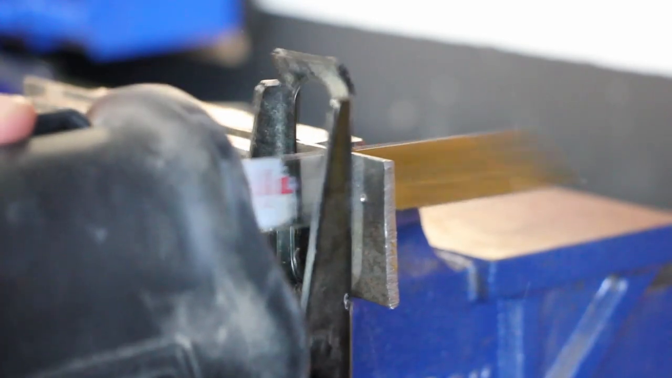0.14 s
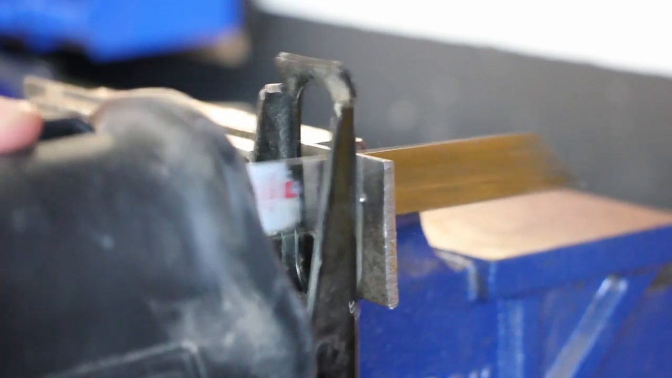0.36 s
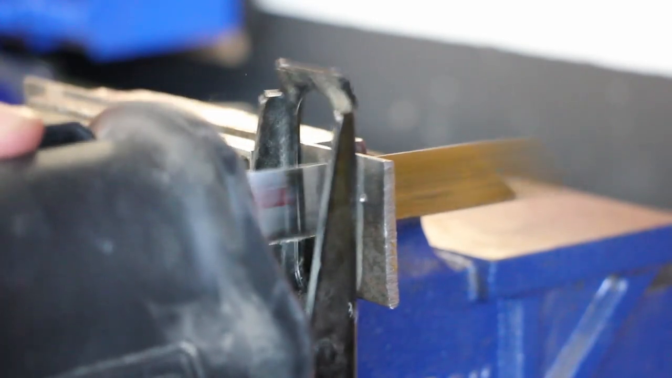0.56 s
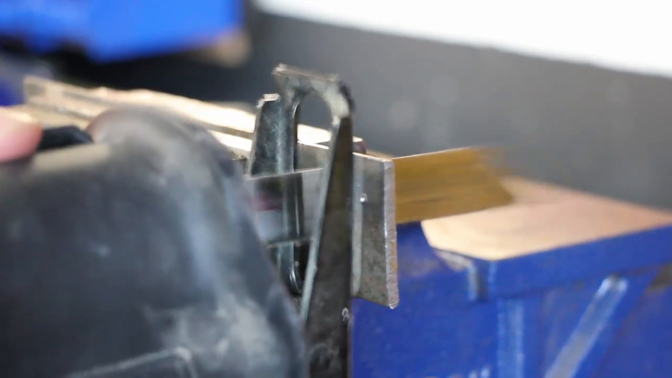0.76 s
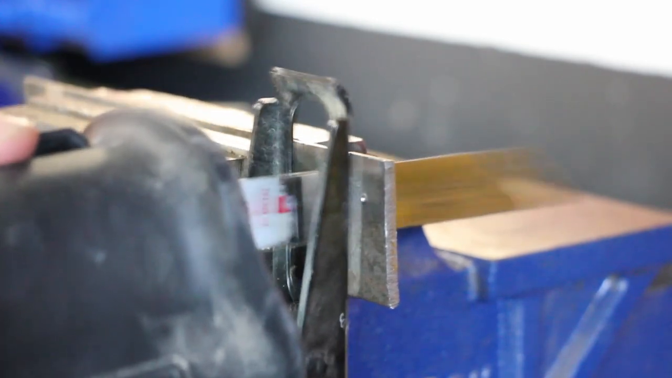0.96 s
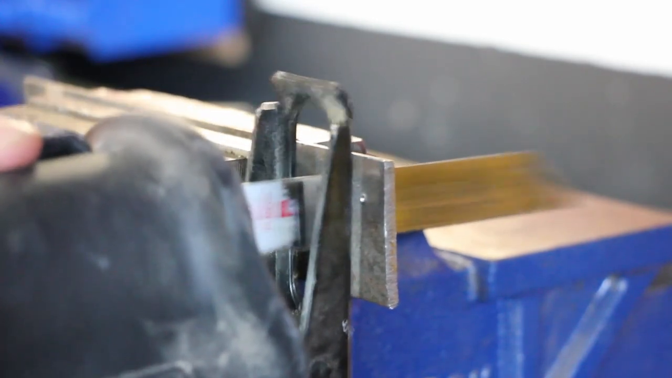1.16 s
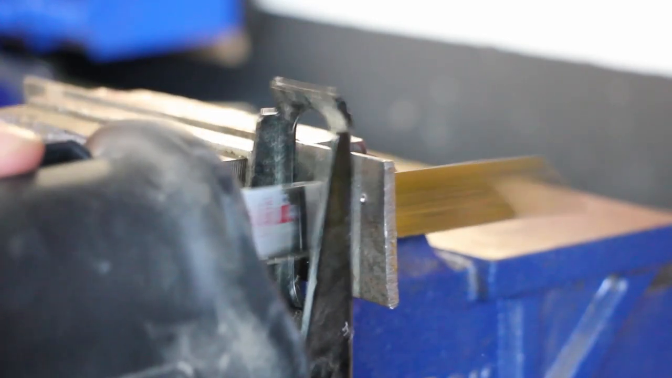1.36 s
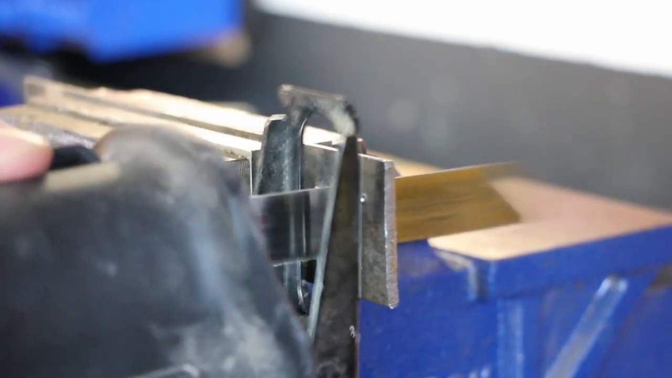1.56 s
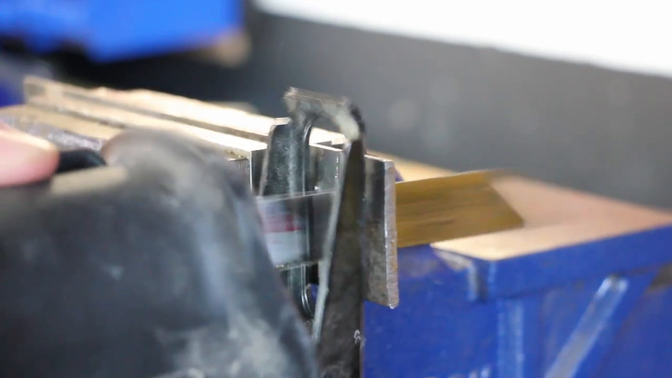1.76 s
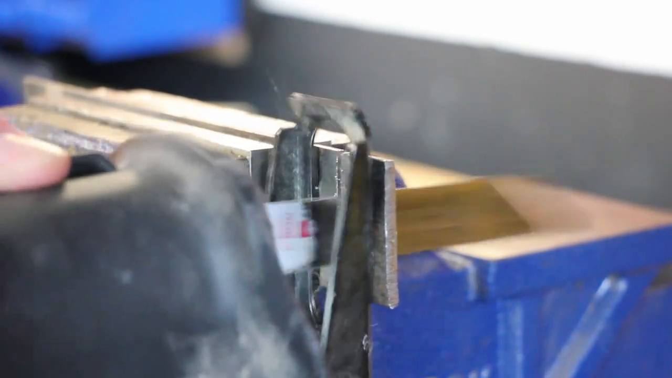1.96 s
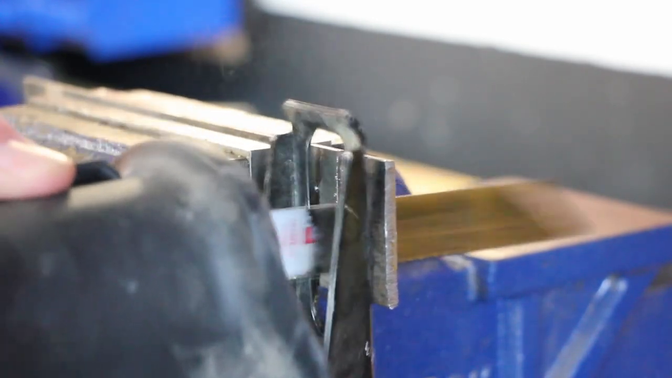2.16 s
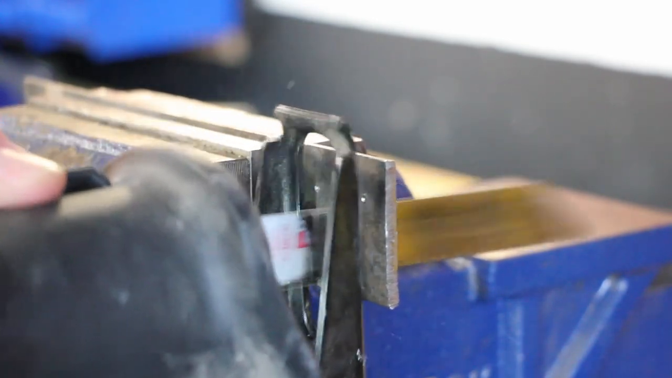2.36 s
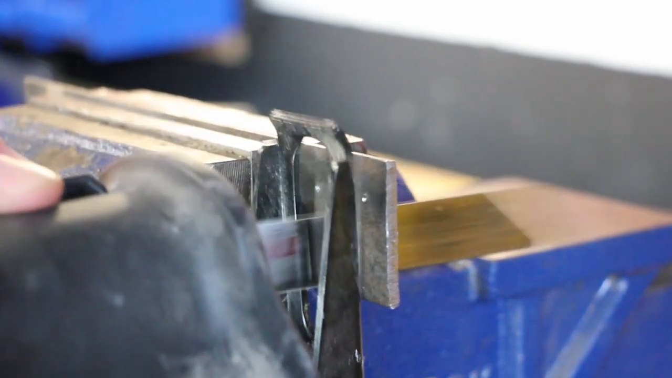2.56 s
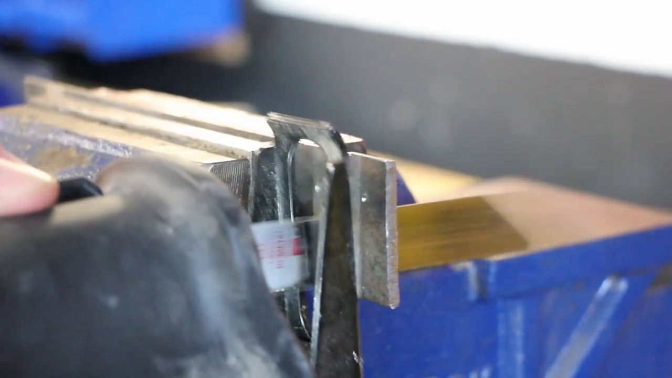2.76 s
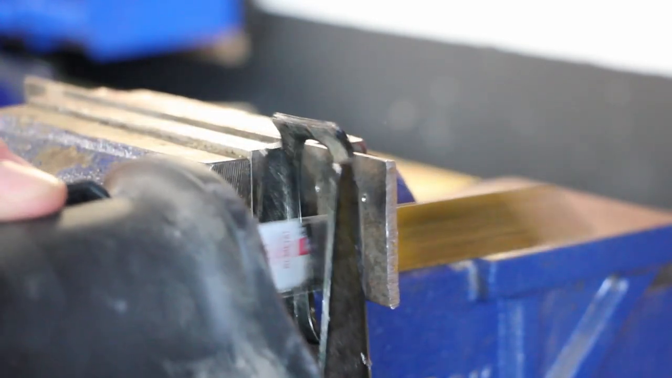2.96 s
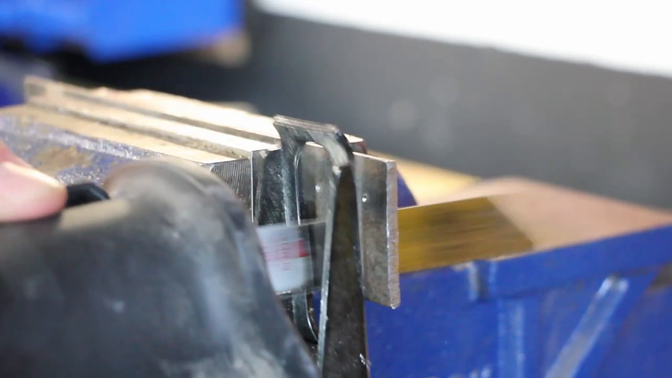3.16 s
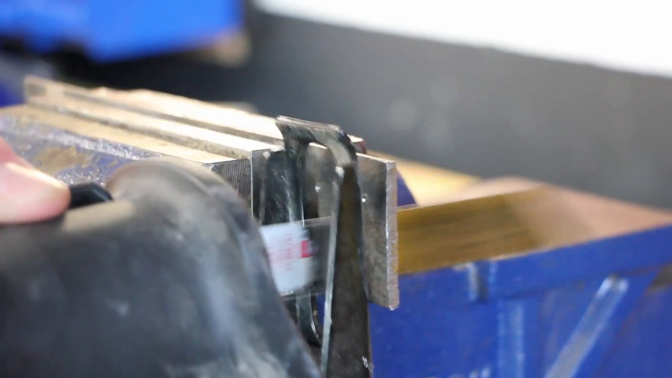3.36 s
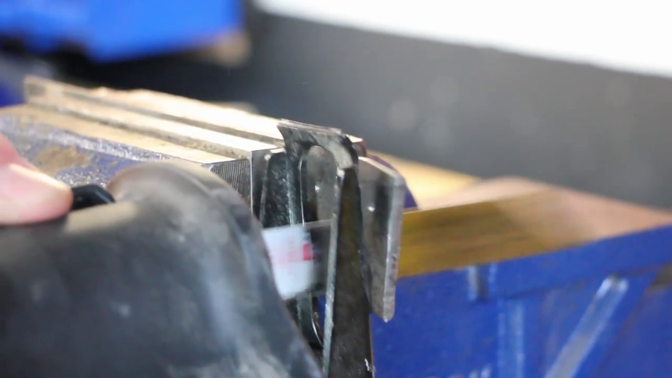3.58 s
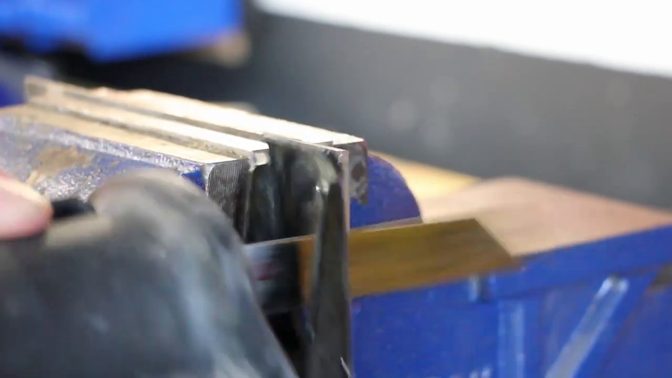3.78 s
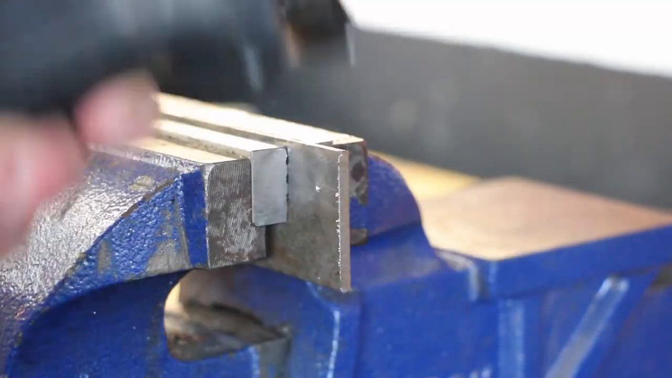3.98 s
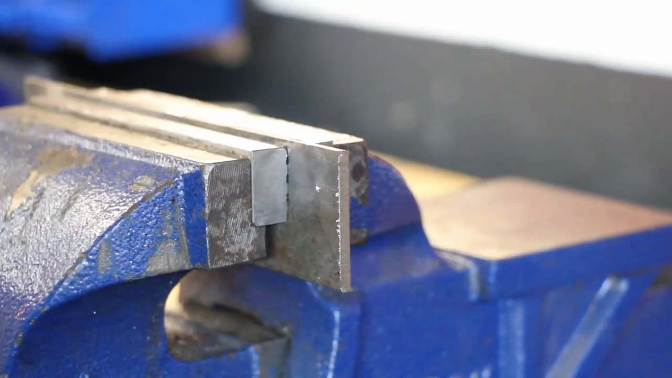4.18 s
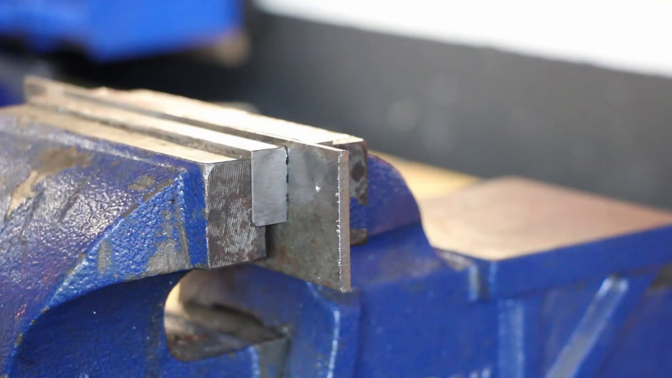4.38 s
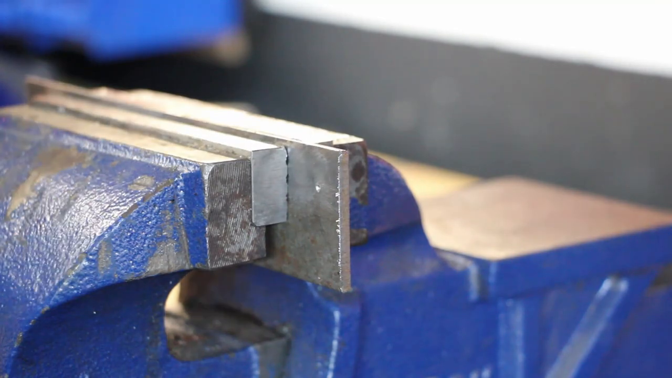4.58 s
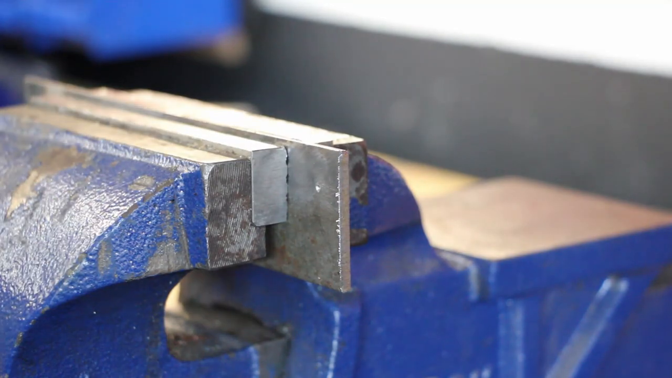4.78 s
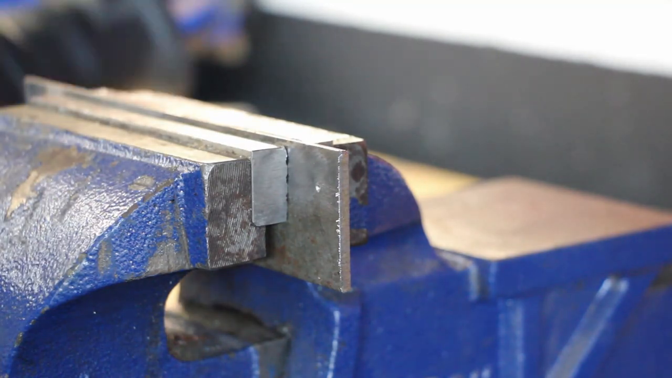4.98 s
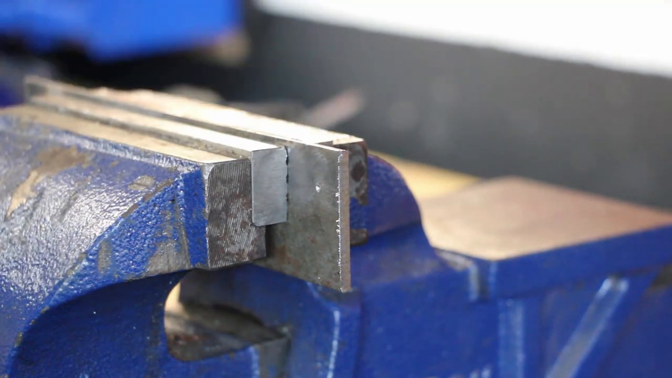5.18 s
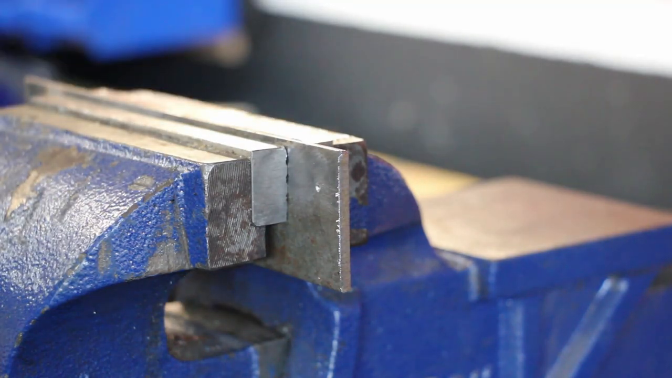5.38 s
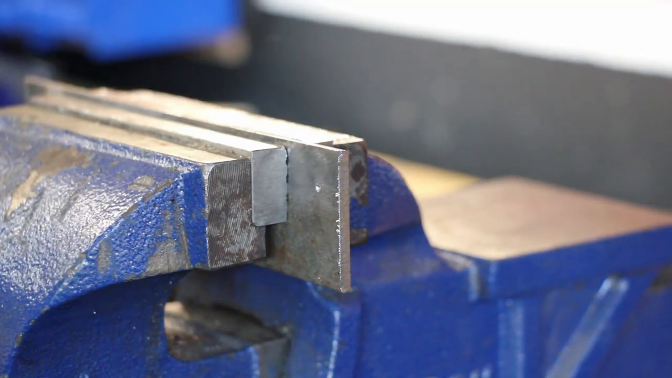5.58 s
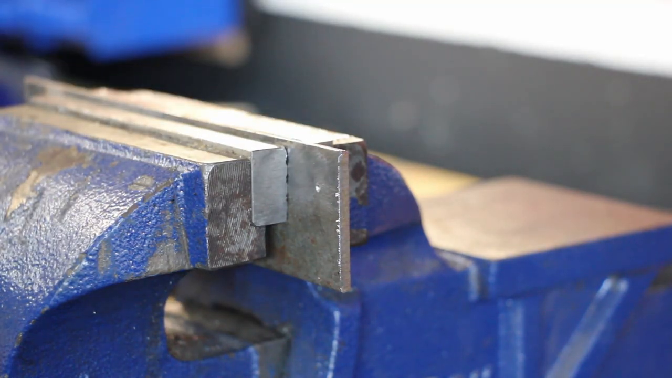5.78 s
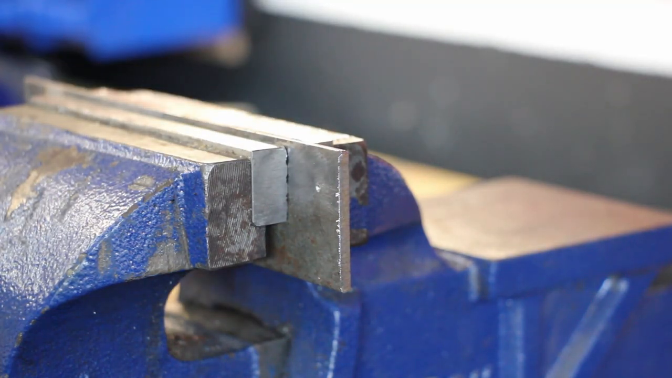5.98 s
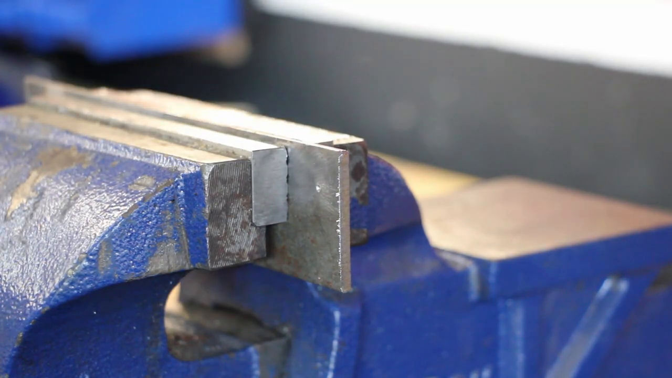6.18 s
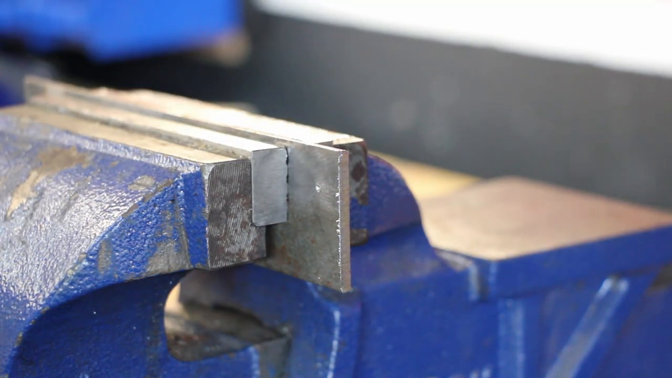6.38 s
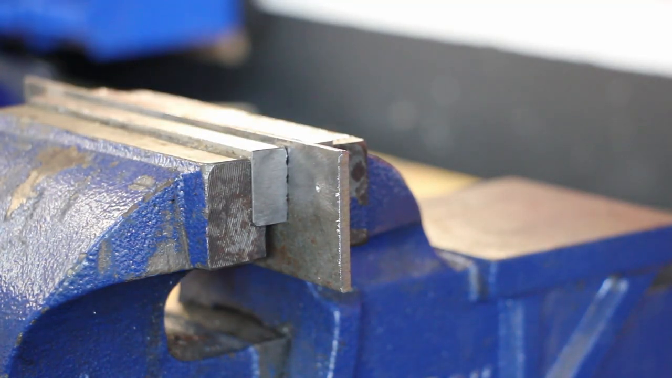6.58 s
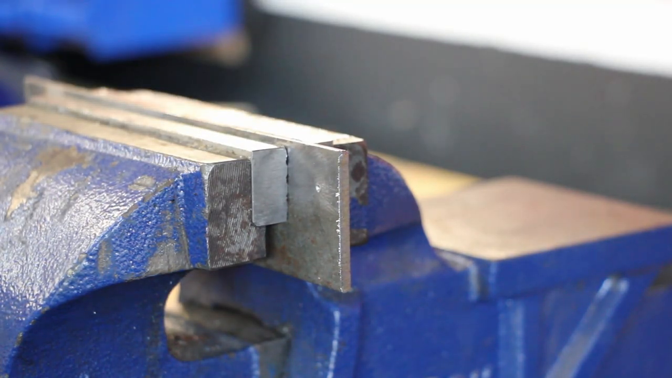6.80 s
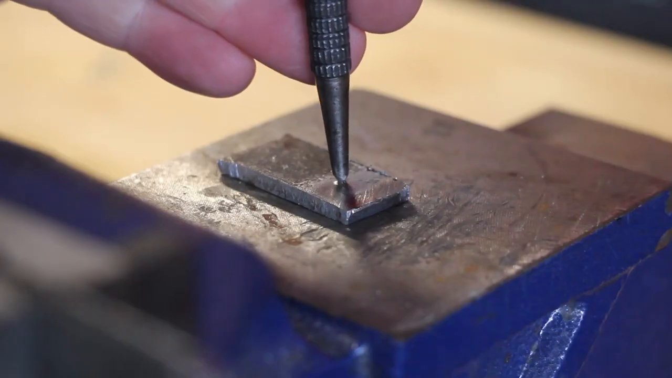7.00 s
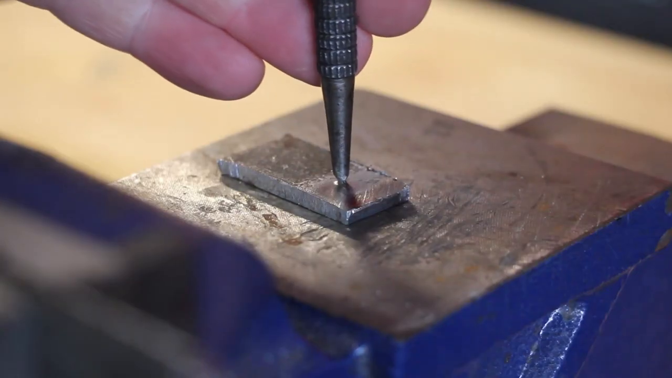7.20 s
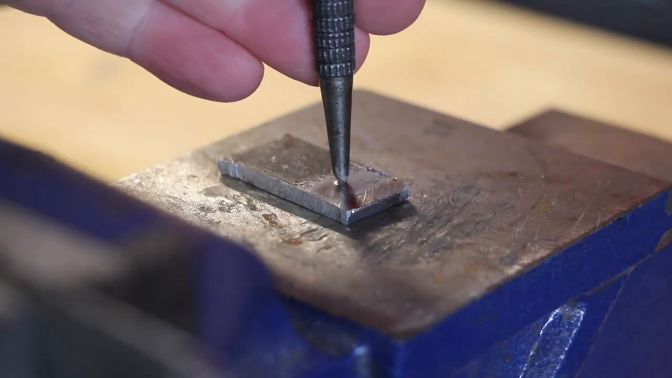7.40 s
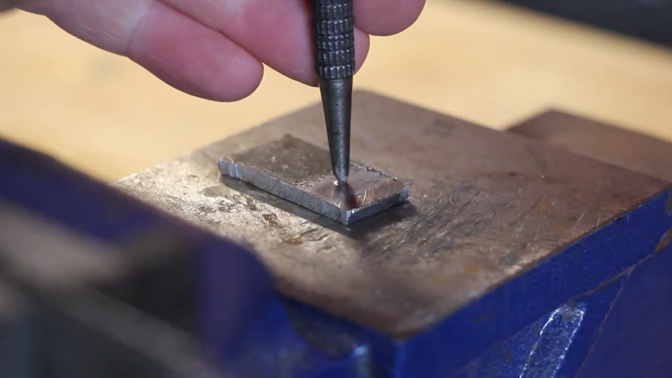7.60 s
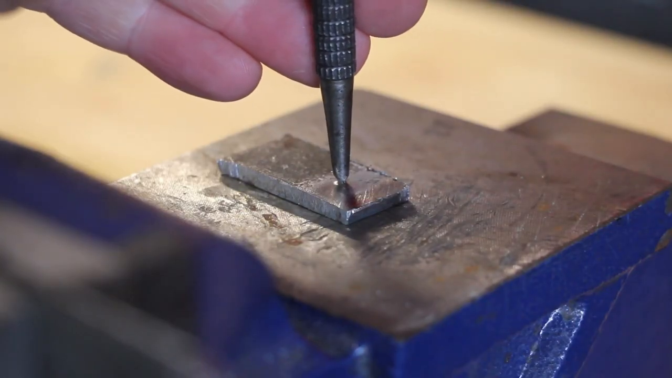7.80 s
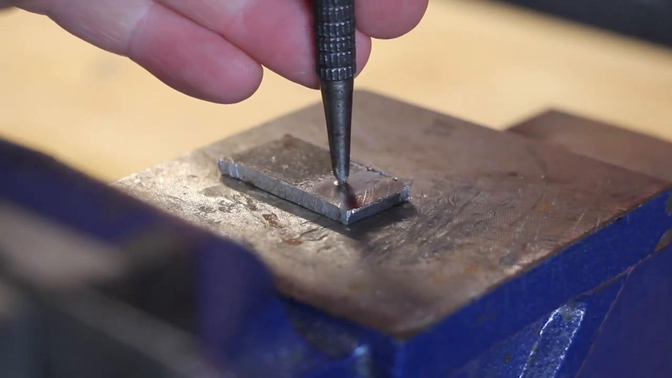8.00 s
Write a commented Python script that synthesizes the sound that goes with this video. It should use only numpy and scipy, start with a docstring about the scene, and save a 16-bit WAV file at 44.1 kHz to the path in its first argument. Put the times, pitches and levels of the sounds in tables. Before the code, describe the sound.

Harsh, rattling metal sawing sinks in pitch, the motor coasts down with clacking, then things thud and scrape on wood before a machine drones.

```python
"""Home garage: a reciprocating saw cuts a steel plate held in a vice; plate resonances sink with the cut.
The blade breaks through and rings, the motor coasts down whining, and the saw is laid on the bench.
Things thud and slide on the wood, then a drill press runs. The loud cut overloads the microphone input.
Chips, air and friction are coloured noise; plate, vice and drone are resonated noise; bench, blade,
hums and whines are sines. Saw speed and stroke phase drive the cutting, the motor and the knocks."""
import sys
import numpy as np
from scipy import signal
from scipy.io import wavfile
from scipy.ndimage import uniform_filter1d

SR = 44100
rng = np.random.default_rng(int(sys.argv[2]) if len(sys.argv) > 2 else 0)


def inscribe(sig):
    """Save sig as 16-bit PCM at rate SR to the path in sys.argv[1].

    A 1-D sig is mono; a 2-D sig holds one channel per row.
    Samples are clipped to [-1, 1] before scaling.
    """
    pcm = np.round(np.clip(np.atleast_2d(sig).T, -1, 1) * 32767)
    wavfile.write(sys.argv[1], SR, pcm.astype(np.int16))


N = 355005
TIME = np.arange(N) / SR

# Garage air spectrum: freq_hz, rel_db_per_hz
AIR_COLOUR = [(25, -6.5), (70, -5), (120, -7), (200, -16), (650, -22), (1200, -21.5), (2500, -28.5),
              (3700, -27.5), (5000, -33.5), (15500, -40)]
# Drill-press drone resonances: freq_hz, width_hz, rel_db
DRONE_MODES = [(156, 270, -2), (380, 77, 1.5), (794, 310, -8), (1170, 60, -7), (2080, 150, -11),
               (3300, 940, -8)]
# Drill-press mains hum: freq_hz, rel_db
MAINS_HUM = [(60, 3.5), (120, 1), (240, -8), (360, -16)]
# Room decay: freq_hz, t60_s
ROOM_DECAY = [(80, 0.45), (500, 0.33), (3000, 0.32), (8000, 0.78), (16000, 0.16)]
# Things sliding on wood: peak_s, level_db, rise_s, fall_s, tilt_db_per_octave
SLIDE_EVENTS = [(5.2, -34.5, 0.023, .03, -0.5), (5.335, -32, 0.025, 0.062, -3),
                (5.57, -29.5, 0.022, 0.029, -3.5), (6.06, -49.5, 0.039, 0.05, 0.5),
                (6.21, -41, 0.14, 0.037, -3), (6.332, -26, 0.013, 0.037, -2.2), (6.8, -48, 0.23, 0.043, -2),
                (7.17, -50.5, 0.25, .02, -2), (7.875, -39.5, 0.028, 0.02, -1.5)]
# Sliding friction spectrum: freq_hz, rel_db_per_hz
SLIDE_COLOUR = [(35, -44), (60, -7), (135, -4.5), (236, -9), (475, -3.5), (585, -12.5), (1170, -2),
                (2050, -7.5), (2250, -10), (3760, 0), (5840, -12), (9970, -14), (15500, -21)]
# Blows on the bench: start_s, thud_db, clack_db
BENCH_BLOWS = [(5.219, -28.5, -21.5), (5.236, -34, -26), (5.308, -35, -28), (5.339, -33.5, -30),
               (6.051, -32.5, -21.5), (6.116, -41, -39), (6.664, -25.5, -27.5)]
# Bench-top modes: freq_hz, rel_db, t60_s
BENCH_MODES = [(70.6, -5.5, 1), (86.2, -4.5, 0.42), (115, 1.5, 0.15), (157, -4.5, 0.3), (228, -5.5, 0.22),
               (362, -6, 0.16), (443, 6, 0.065), (522, 4, 0.054), (566, -15, .2), (760, -8, 0.057),
               (1100, -17, .15), (1361, -14.5, .16)]
# Clatter spectrum: freq_hz, rel_db_per_hz
CLATTER_COLOUR = [(60, -13), (200, 8.0), (600, 0), (1300, -7.0), (2200, -14.5), (4000, -26), (12000, -40)]
# Saw body buzzing on wood: peak_s, level_db
BUZZES = [(5.47, -32), (5.57, -27.5)]
# Crank knocks placed at set times, besides those at each reversal: start_s, peak_db
PLACED_KNOCKS = [(4.391, -12), (4.446, -23), (4.566, -23), (4.7, -23)]
# Knock spectrum: freq_hz, rel_db_per_hz
KNOCK_COLOUR = [(60, -50), (200, -20), (500, -9), (1000, -10), (1600, -3), (2600, -10.5), (4000, -27),
                (8000, -33), (15000, -32)]
# Blade springing free: start_s, lower_mode_db, upper_mode_db
BLADE_TWANGS = [(3.625, -26, -21), (4.239, -24.5, -40)]
# Blade modes: freq_hz, t60_s
BLADE_MODES = [(11660, 0.19), (13830, 0.27)]
# Graze resonances: freq_hz, width_hz, rel_db
GRAZE_MODES = [(2110, 580, 1), (3740, 400, -4), (4720, 460, -4)]
# Saw speed, trigger held: time_s, strokes_per_s
POWERED_SPEED = [(0, 36.23), (.8, 36.25), (2.15, 35.47), (2.65, 36.58), (3.05, 37.84), (3.7, 37.8)]
# Motor tones: order_per_shaft_turn, fan_whine_rel_db, bearing_song_rel_db
MOTOR_TONES = [(7.2, -17, -4), (12, 0, -3), (17.1, -40, -3), (24, -19, -8), (29.2, -50, -9), (36, -42, -14)]
# Fan and gear spectrum: freq_hz, rel_db_per_hz
FAN_COLOUR = [(35, -44), (60, -53), (215, -25), (312, -8.5), (394, -9), (705, -3), (773, -4), (1200, 1),
              (1960, -4), (3840, -3.5), (4520, -8.5), (5580, -9.5), (15500, -30.5)]
# Brush rasp spectrum: freq_hz, rel_db_per_hz
BRUSH_COLOUR = [(150, -16.5), (350, -1.5), (700, -5), (1100, -5), (1700, 2.5), (3800, -3), (4800, -12),
                (7300, -10.5), (8150, -7), (8900, -18), (9600, -8.5), (10800, -16), (11700, -16),
                (15500, -24)]
# Pressure of saw on steel: time_s, pressure_0_to_1
FEED_PRESSURE = [(0, 0.42), (.5, 0.33), (1, 0.63), (1.5, 0.62), (2.1, 0.3), (2.6, 0.7), (3.6, 0.6)]
# Progress through the plate: time_s, depth_0_to_1
CUT_DEPTH = [(0, 0.01), (.4, 0.05), (.7, .125), (1.2, 0.26), (1.6, 0.36), (2.35, 0.67), (2.6, 0.74),
             (3.4, 1)]
# Tearing chip spectrum: freq_hz, rel_db_per_hz
CUT_COLOUR = [(25, -8), (55, -11), (120, -9), (250, -9), (450, -5), (800, -2), (1500, -1), (4000, -2),
              (5500, -6), (8000, -9), (12000, -11), (16000, -14)]
# Plate resonances: uncut_hz, through_hz, width_hz, top_db, loudest_depth, depth_away_for_6_db_less
PLATE_MODES = [(965, 640, 76, -25, .02, .36), (2190, 1170, 120, -24.5, .42, .4),
               (4720, 2360, 150, -28.5, .55, .8), (3680, 3400, 117, -30, .4, 1.1),
               (5640, 3600, 130, -28.5, .01, .065)]
# Blade chatter and one flaring ring: peak_s, pitch_hz, level_db, rise_s, fall_s
CHATTER_EVENTS = [(.1, 1794, -29, .2, 0.78), (1.4, 4635, -30.5, 0.81, 0.41),
                  (1.572, 3610, -20, 0.048, 0.21), (1.78, 3405, -17.5, 0.073, .12),
                  (2.33, 1415, -23, .05, 0.2), (2.35, 3060, -26.5, .15, 0.14),
                  (2.55, 2660, -23.5, 0.17, 0.12), (3.219, 3524, -27.5, 0.16, 0.37),
                  (3.56, 2435, -24.5, 0.33, 0.06)]
# Fixed vice and shoe modes, lit up by passing plate resonances: freq_hz, gain_db
VICE_MODES = [(857, -42), (977, -44), (1363, -40), (1662, -42), (1956, -43), (2024, -43), (2319, -46),
              (2665, -42), (3024, -43), (3358, -43), (3595, -43), (4570, -44)]
# Vice shaking at 1, 2, 3.. times the stroke rate: rel_db
SHAKE_HARMONICS = [-30, 3.5, -3, -14, -4, 1]

# Garage air fades in
AIR_FROM_S, AIR_FADE_S, AIR_DB = 5.83, 0.21, -49
# Drill press starts; its whine weakens under load
DRILL_ON_S, DRILL_RUSH_DB, HUM_DB, IDLE_HZ, IDLE_DB, IDLE_LOADED_DB = 6.85, -46.5, -43, 717, -57.5, -1
# Bit bites: drone grows, hum eases
BITE_S, DRONE_AT_BITE_DB, DRONE_DB_PER_S, HUM_LOADED_DB = 7.14, -46.5, 8, -4.5
# Dying motor hums through the bench
LAID_S, BENCH_HUM_DB, BENCH_HUM_HZ, BUZZ_RISE_S, BUZZ_FALL_S = 5.22, -48, 489, 0.024, 0.023
# Crank slack knocks at each reversal of the coasting blade
KNOCK_PEAK_DB, KNOCK_SCATTER_DB, KNOCK_FROM_S, KNOCK_TO_S = -22.5, 1, 4.42, 5.15
# Coasting blade grazes the plate once
GRAZE_S, GRAZE_DB, GRAZE_RISE_S, GRAZE_FALL_S = 4.212, -11, 0.0085, 0.021
# Trigger let go: air drag takes its share of the speed exponentially, friction the rest steadily
RELEASE_S, DRAG_SHARE, DRAG_S, FRICTION_S = 3.759, .512, .567, 2.129
SHAFT_TURNS_PER_STROKE = 17.5
# Fan air grows with speed squared, gear rattle by a low power; load lowers both
FAN_DB, GEARS_DB, GEARS_POWER, LOADED_DB = -20, -38, 0.39, -12.5
# Fan whine is radiated poorly below a corner
WHINE_DB, WHINE_CORNER_HZ, WHINE_STEEPNESS = -29.5, 3430, 11
# Brushes rasp and bearings sing once the saw slows past this
BRUSH_DB, BRUSH_STROKES_PER_S, BEARINGS_DB = -33.5, 12.1, -37.5
# Blade breaks through, leaves the slot; unloaded motor roars
THROUGH_S, CLEAR_S, FREE_S = 3.63, 3.775, 3.76
# Pressing harder makes the cut louder and evens out its throb
CUT_DB, PRESS_DB, HALF_THROB_DB, PRESS_HALF_THROB_DB = -23.5, 2.5, 6.5, -3.5
# High rings swell on each pull and are choked on the return
CHOKE_DB, CHATTER_WIDTH_HZ, VICE_WIDTH_HZ, VICE_CHIPS_DB = 9, 133, 32, -9.5
# Teeth squeal on the pull for a few strokes
SQUEAL_FROM_S, SQUEAL_TO_S, SQUEAL_DB, SQUEAL_HZ, SQUEAL_WIDTH_HZ = 1.94, 2.225, -23, 12700, 1830
# Vice shaking when cut through, and the change when uncut
SHAKE_THROUGH_DB, SHAKE_UNCUT_DB = -40.5, -15
CEILING_DB, BAND_LIMIT_HZ = -12.8, 15900


def amp(db):
    """Decibels to gain."""
    return 10 ** (np.asarray(db) / 20)


def unit(x):
    """Scale to rms 1."""
    return x / np.sqrt(np.mean(x ** 2) + 1e-20)


def curves(rows):
    """Each column of a table as a curve in time."""
    time_s, *columns = np.transpose(rows)
    return [np.interp(TIME, time_s, column) for column in columns]


def after(s, edge_s):
    """Smooth rise from 0 to 1, halfway at the given time."""
    return .5 + .5 * np.tanh((TIME - s) / edge_s)


def swell(s, rise_s, fall_s):
    """Exponential growth to 1 at a time, then exponential decay."""
    return np.exp(-np.maximum((s - TIME) / rise_s, (TIME - s) / fall_s))


def bump(turns, at, width):
    """A smooth peak once a turn."""
    return np.exp((np.cos(2 * np.pi * (turns - at)) - 1) / (2 * np.pi * width) ** 2)


def read(points, hz):
    """Table values interpolated on a log-frequency axis."""
    freq_hz, value = np.transpose(points)
    return np.interp(np.log(hz + 1), np.log(freq_hz + 1), value)


def colour(x, points, tilt_db=0):
    """Causal minimum-phase filter with the given spectrum; rms 1."""
    hz = np.abs(np.fft.fftfreq(4096, 1 / SR))
    gain_db = np.maximum(read(points, hz), -100) + tilt_db * np.log2(hz / 1000 + .1)
    log_gain = np.log(amp(gain_db))
    taps = np.fft.ifft(np.exp(np.conj(signal.hilbert(log_gain)))).real
    return unit(signal.oaconvolve(x, taps)[:len(x)])


def noise():
    """White noise."""
    return rng.standard_normal(N)


def grit(per_s, spread_db):
    """Random tiny impacts of unequal size; rms 1."""
    hits = rng.random(N) < per_s / SR
    size = amp(spread_db * np.minimum(rng.exponential(1, N), 4))
    return unit(noise() * hits * size)


def resonate(x, hz, width_hz):
    """Steep resonance, fixed or following a pitch curve: shift to 0 Hz, double pole, shift back; rms 1."""
    turn = np.exp(2j * np.pi * np.cumsum(hz * np.ones(N)) / SR)
    r = np.exp(-np.pi * width_hz * np.sqrt(2) / SR)
    return unit((turn * signal.lfilter([1], [1, -2 * r, r * r], x / turn)).real)


def add(mix, s, sound):
    """Mix a sound in at a time."""
    part = mix[round(s * SR):][:len(sound)]
    part += sound[:len(part)]


def garage():
    """Room air and hiss; the drill press hums, then drones in broad resonances as its bit bites."""
    running, biting = after(DRILL_ON_S, edge_s=.015), after(BITE_S, edge_s=0.16)
    air_gain = np.hypot(amp(AIR_DB) * after(AIR_FROM_S, AIR_FADE_S), amp(DRILL_RUSH_DB) * running)
    hiss = amp(-8.5) * np.array([noise(), noise()])  # independent left and right
    air = air_gain * (colour(noise(), AIR_COLOUR) + hiss)
    hum = unit(sum(amp(db) * np.sin(2 * np.pi * (hz * TIME + rng.random())) for hz, db in MAINS_HUM))
    whine = amp(IDLE_DB + IDLE_LOADED_DB * biting) * unit(np.sin(2 * np.pi * IDLE_HZ * TIME))
    idling = running * (amp(HUM_DB + HUM_LOADED_DB * biting) * hum + whine)
    drone = unit(sum(amp(db) * resonate(noise(), hz, width_hz) for hz, width_hz, db in DRONE_MODES))
    drilling = amp(DRONE_AT_BITE_DB + DRONE_DB_PER_S * (TIME - BITE_S)) * biting * drone
    return air + idling + drilling


def slides():
    """Gritty friction that swells and dies: things pushed over the bench."""
    out = np.zeros(N)
    for s, db, rise_s, fall_s, tilt_db in SLIDE_EVENTS:
        friction = colour(grit(per_s=9000, spread_db=0.5), SLIDE_COLOUR, tilt_db)
        out += amp(db) * swell(s, rise_s, fall_s) * friction
    return out


def bench(speed):
    """Blows ring the bench-top modes under a short clatter; the laid-down saw hums and buzzes through it."""
    out, t = np.zeros(N), TIME[:SR // 2]
    for s, thud_db, clack_db in BENCH_BLOWS:
        ring = np.zeros(len(t))
        detune = rng.uniform(0.94, 1.04, len(BENCH_MODES))
        for k, (hz, db, t60_s) in enumerate(BENCH_MODES):
            ring += (-1) ** k * amp(db - 60 * t / t60_s) * np.sin(2 * np.pi * hz * detune[k] * t)
        clatter = colour(noise()[:len(t)], CLATTER_COLOUR)
        add(out, s, amp(thud_db) * ring + amp(clack_db - 60 * t / 0.091) * clatter)
    hum = amp(BENCH_HUM_DB) * after(LAID_S, edge_s=.01) * np.tanh(speed / 0.17)
    buzz = sum(amp(db) * swell(s, BUZZ_RISE_S, BUZZ_FALL_S) for s, db in BUZZES)
    return out + (hum + buzz) * resonate(noise(), BENCH_HUM_HZ, 71)


def knocks(strokes):
    """Crank slack clacks as short noise bursts at reversals; the freed blade rings in two thin modes."""
    out, t = np.zeros(N), TIME[:SR // 2]
    reversals_s = TIME[1:][np.diff(np.floor(2 * strokes - .2)) > 0]
    usual = [(s, KNOCK_PEAK_DB + KNOCK_SCATTER_DB * z) for s, z in zip(reversals_s, noise())
             if KNOCK_FROM_S < s < KNOCK_TO_S]
    for s, peak_db in PLACED_KNOCKS + usual:
        decay = amp(-60 * t / 0.032) + 0.25 * amp(-60 * t / 0.1)
        clack = colour(rng.standard_normal(len(t)) * decay, KNOCK_COLOUR)
        add(out, s, amp(peak_db) * clack / abs(clack).max())
    beat = 1 + 0.61 * np.cos(2 * np.pi * 24 * t)  # the blade still swings while it rings
    for s, *levels_db in BLADE_TWANGS:
        for db, (hz, t60_s) in zip(levels_db, BLADE_MODES):
            add(out, s, amp(db - 60 * t / t60_s) * beat * np.sin(2 * np.pi * hz * t))
    return out


def graze():
    """A short screech of teeth on the cut edge: resonated noise over chip noise."""
    screech = unit(sum(amp(db) * resonate(noise(), hz, width_hz) for hz, width_hz, db in GRAZE_MODES))
    scrape = screech + amp(-8.5) * colour(noise(), CUT_COLOUR)
    return amp(GRAZE_DB) * swell(GRAZE_S, GRAZE_RISE_S, GRAZE_FALL_S) * scrape


def saw_speed():
    """Strokes per second: held under power, then coasting to a stop under drag and friction."""
    powered, = curves(POWERED_SPEED)
    coast_s = np.maximum(TIME - RELEASE_S, 0)
    drag = DRAG_SHARE * np.exp(-coast_s / DRAG_S)
    friction = (1 - DRAG_SHARE) * (1 - coast_s / FRICTION_S)
    return powered * np.maximum(drag + friction, 0)


def motor(speed, strokes):
    """Gear rattle and fan air, sine whine of vanes and bearings, brushes that rasp once a shaft turn."""
    shaft = SHAFT_TURNS_PER_STROKE * strokes
    shaft_hz = SHAFT_TURNS_PER_STROKE * speed
    pace, free = speed / speed.max(), after(FREE_S, edge_s=0.035)
    rush = np.hypot(amp(FAN_DB) * pace ** 2, amp(GEARS_DB) * pace ** GEARS_POWER) * amp(LOADED_DB * (1 - free))
    rattle = unit(1 + .6 * bump(2 * strokes, .25, .07))  # twice a stroke
    out = rush * colour(grit(per_s=9000, spread_db=1.0) * rattle, FAN_COLOUR)
    vane_hz = 12 * shaft_hz
    whine = amp(WHINE_DB) * free / np.hypot(1, (WHINE_CORNER_HZ / (vane_hz + 1)) ** WHINE_STEEPNESS)
    slow = (.5 + .5 * np.tanh((BRUSH_STROKES_PER_S - speed) / 4)) * np.tanh(speed / 2.5)
    bearings = amp(BEARINGS_DB) * slow * np.clip(speed / 7 - .4, 0, 1)
    for order, fan_db, bearing_db in MOTOR_TONES:
        flutter = unit(amp(2.5 * unit(uniform_filter1d(noise(), size=900))))
        audible = order * shaft_hz < BAND_LIMIT_HZ
        gain = (whine * amp(fan_db) + bearings * amp(bearing_db)) * flutter * audible
        out += gain * np.sin(2 * np.pi * order * shaft)
    rasp = colour(noise() * (.9 + bump(shaft, .5, .1)), BRUSH_COLOUR)
    low_pass = signal.butter(3, 4200, fs=SR, output="sos")
    dull = signal.sosfilt(low_pass, colour(noise(), BRUSH_COLOUR))
    edge = np.clip((speed - 2.2) / 2, .15, 1)  # slow brushes lose their hiss
    return out + amp(BRUSH_DB) * slow * (edge * rasp + np.sqrt(1 - edge ** 2) * dull)


def cutting(strokes):
    """Teeth tear chips on each pull and rub on the return; the plate rings and the vice shakes."""
    (feed,), (depth,) = curves(FEED_PRESSURE), curves(CUT_DEPTH)
    in_steel, in_slot = 1 - after(THROUGH_S, edge_s=0.029), 1 - after(CLEAR_S, edge_s=0.11)
    pull = bump(strokes, .33, .13) + .25 * bump(strokes, .7, .09)
    bite = amp(0.46 * noise()[strokes.astype(int)])  # no two strokes bite alike
    half_throb_db = HALF_THROB_DB + PRESS_HALF_THROB_DB * feed
    force = unit(amp(2 * half_throb_db * pull * in_slot) * bite)
    # the shoe hits the plate at each reversal
    slap = unit(.8 + in_slot * (bump(strokes, .1, .05) + .5 * bump(strokes, .58, .07)))
    chips = colour(grit(per_s=9000, spread_db=1.5), CUT_COLOUR)
    body = signal.sosfilt(signal.butter(2, 2200, fs=SR, output="sos"), chips)
    treble = signal.sosfilt(signal.butter(2, 2200, "high", fs=SR, output="sos"), chips)
    # minus sign: second-order halves are in opposite phase at the crossover
    tearing = amp(CUT_DB + PRESS_DB * feed) * in_slot * (body * slap - treble * force)

    plate, choke = np.zeros(N), unit(amp(CHOKE_DB * bump(strokes, .42, .17)))
    for uncut_hz, through_hz, width_hz, db, loudest, reach in PLATE_MODES:
        drive, beat = (force, choke) if uncut_hz > 3000 else (slap, 1)
        sinking_hz = uncut_hz * (through_hz / uncut_hz) ** depth
        ring = beat * resonate(noise() * drive, sinking_hz, width_hz)
        plate += amp(db) * .5 ** (((depth - loudest) / reach) ** 2) * in_steel * ring
    for s, hz, db, rise_s, fall_s in CHATTER_EVENTS:
        drive, beat = (force, choke) if hz > 2000 else (slap, 1)
        ring = beat * resonate(noise() * drive, hz, CHATTER_WIDTH_HZ)
        plate += amp(db) * swell(s, rise_s, fall_s) * in_steel * ring

    vice_drive = plate + amp(VICE_CHIPS_DB) * tearing
    vice = sum(amp(db) * resonate(vice_drive, hz, VICE_WIDTH_HZ) for hz, db in VICE_MODES)
    squealing = after(SQUEAL_FROM_S, edge_s=0.011) - after(SQUEAL_TO_S, edge_s=0.018)
    squeal_ring = resonate(noise() * bump(strokes, 0.43, 0.087), SQUEAL_HZ, SQUEAL_WIDTH_HZ)
    squeal = amp(SQUEAL_DB) * squealing * squeal_ring
    shake = unit(sum(amp(db) * np.sin(2 * np.pi * (k * strokes + rng.random()))
                     for k, db in enumerate(SHAKE_HARMONICS, 1)))
    shaking = amp(SHAKE_THROUGH_DB + SHAKE_UNCUT_DB * (1 - depth)) * in_steel * shake
    return tearing + plate + vice + squeal + shaking


def room(x):
    """A short tail of sparse random reflections, decaying at a rate set per frequency."""
    t = TIME[:SR // 2]
    taps = rng.standard_normal(len(t)) * (rng.random(len(t)) < .06) * (t > .006)
    hz, frame_s, z = signal.stft(taps, SR, nperseg=256)
    decay = amp(-60 * frame_s / read(ROOM_DECAY, hz)[:, None])
    tail = signal.istft(z * decay, SR, nperseg=256)[1]
    return signal.fftconvolve(x, tail / np.linalg.norm(tail))[:N]


def scene():
    """Saw close to the microphone, bench a little further off, garage behind."""
    speed = saw_speed()
    strokes = np.cumsum(speed) / SR
    background = garage()
    wood = slides() + bench(speed)
    saw = knocks(strokes) + graze() + motor(speed, strokes) + cutting(strokes)
    return saw + wood + room(amp(-8.0) * saw + amp(-4.5) * wood) + background


def record(dry):
    """The overloaded input flattens the peaks of the cut; then the band limit."""
    flattened = dry / (1 + (dry / amp(CEILING_DB)) ** 6) ** (1 / 6)
    band_limit = signal.firwin(511, BAND_LIMIT_HZ, window=("kaiser", 9), fs=SR)
    return signal.oaconvolve(flattened, band_limit[None], "same")


dry = scene()
out = record(dry)
inscribe(out)
```